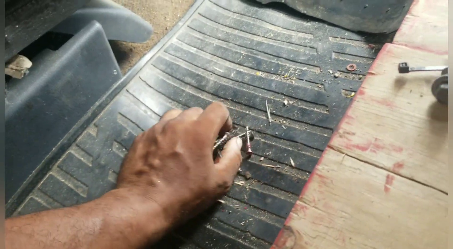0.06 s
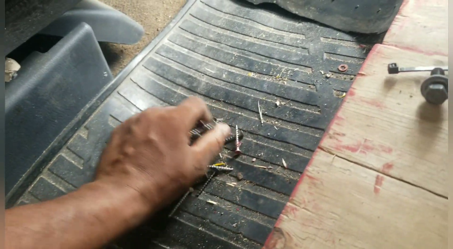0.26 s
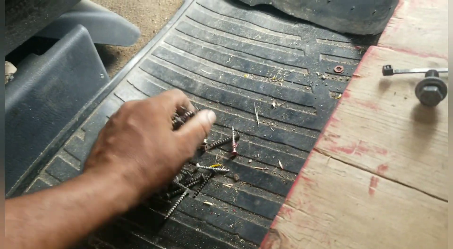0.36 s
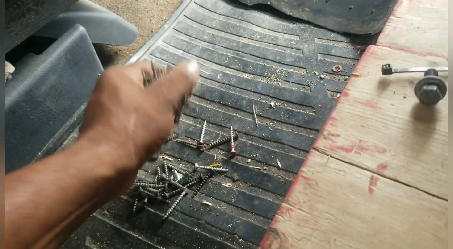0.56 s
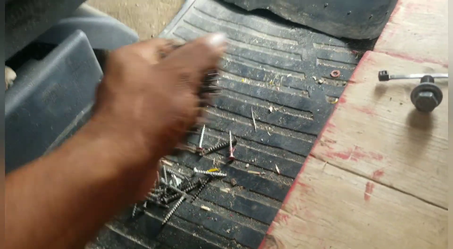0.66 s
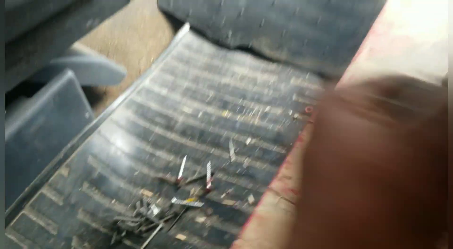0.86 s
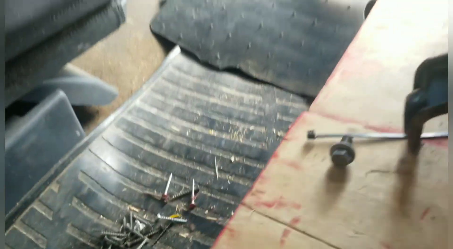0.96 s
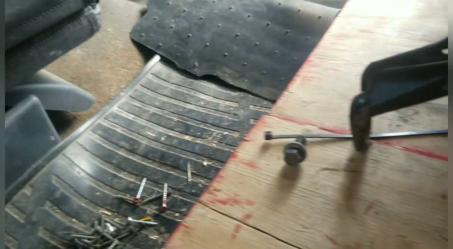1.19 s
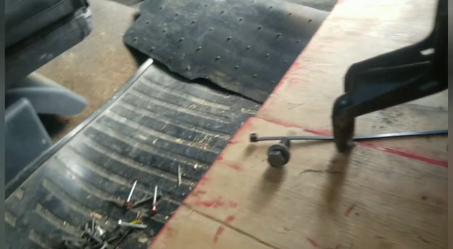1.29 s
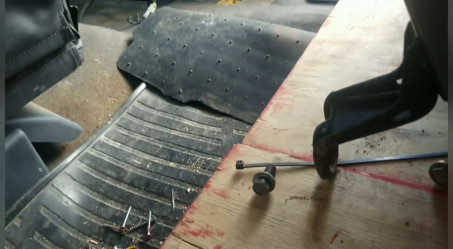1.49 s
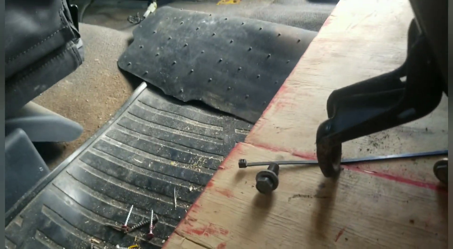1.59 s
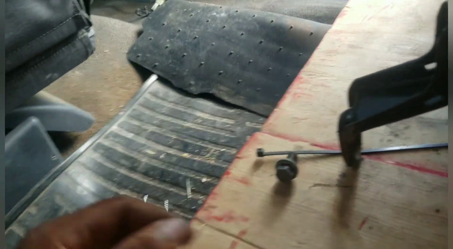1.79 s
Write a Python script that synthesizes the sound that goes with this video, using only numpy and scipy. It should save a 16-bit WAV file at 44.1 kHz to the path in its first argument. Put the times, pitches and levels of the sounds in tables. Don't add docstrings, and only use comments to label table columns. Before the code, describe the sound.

Handful of steel screws jingles sharply, pauses, then rattles and knocks on thin plastic inside a vehicle

```python
import sys
import numpy as np
from scipy import signal
from scipy.fft import rfft, irfft
from scipy.io import wavfile

SR = 44100
rng = np.random.default_rng(int(sys.argv[2]) if len(sys.argv) > 2 else 0)


def transcribe(u):
    v = np.clip(np.atleast_2d(u).T, -1, 1)
    q = np.round(v * 32767).astype(np.int16)
    wavfile.write(sys.argv[1], SR, q)


def ratio(d):
    e = np.asarray(d, float) / 20
    return 10 ** e


N = 81585

# f/Hz, level/dB
STILL_CAB_COLOUR = [(12, -45), (20, -12), (65, 5), (107, -16.5), (177, -17), (228, -29.5), (607, -42),
                    (1480, -43.5), (16000, -44)]
# t/s, level/dB
BOOM_LEVEL = [(0, -61), (.14, -50.5), (.45, -59), (.55, -49), (.65, -44.5), (.78, -50), (.9, -46.5),
              (1.0, -50), (1.08, -55), (1.27, -57.5), (1.4, -55), (1.62, -55), (1.85, -57)]
# f/Hz, level/dB
BOOM_COLOUR = [(53, -60), (90, -35.5), (140, 2.5), (199, -1.5), (344, -16), (400, -17.5), (447, -29),
               (1000, -50.5), (1300, -64), (2200, -120)]
# t/s, level/dB
RUB_LEVEL = [
    (0, -78),
    (.2, -62.5),
    (.5, -60.5),
    (.56, -73),
    (.64, -66.5),
    (.75, -73),
    (.92, -76),
    (1.0, -94.5),
    (1.85, -91.5),
]
# f/Hz, level/dB
RUB_COLOUR = [(1060, -48), (1800, -11.5), (2500, -8.5), (4170, -14.5), (5390, -0.5), (7490, -17.5),
              (8280, -32), (13400, -9), (16000, -20.5)]
# t/s, level/dB
SCUFF_LEVEL = [
    (0, -38.5),
    (.03, -55),
    (.2, -46.5),
    (.45, -55.5),
    (.68, -75),
    (.8, -67),
    (1.25, -68),
    (1.6, -56.5),
    (1.72, -59.5),
    (1.85, -63.5),
]
# f/Hz, level/dB
SCUFF_COLOUR = [(180, -36), (300, 2.5), (679, -2.5), (847, -7.5), (1400, -16.5), (2500, -19.5), (3250, -57),
                (5500, -120)]
# f/Hz, likeness (1 = the same)
LIKENESS = [(60, 0.9), (240, 0.63), (950, 0.56), (3770, -0.02), (15000, -0.15)]
# f/Hz, time to fall 60 dB t60/s
CAB_T60 = [(100, 0.043), (500, 0.28), (2000, 0.23), (6000, 0.2), (15000, 0.22)]
# t/s, peak level/dB, thump level/dB, top level/dB
GRABS = [(0.002, -58.5, -12, -1.5), (0.03, -58.5, 16.5, -21), (0.0574, -59.5, 13.5, 5.5),
         (0.077, -54, -21, 0), (0.1466, -54.5, 13.5, -1.5), (0.1725, -59.5, 5, 8), (0.2463, -20.5, -3, 1.5),
         (0.255, -32, -6, -7), (0.271, -38.5, -12, 14), (0.306, -33.5, -8, -6), (0.3591, -35, 3, 4.5),
         (0.368, -36.5, -12, -6), (0.384, -47, -14, -14), (0.4744, -54, 2, 6.5), (0.5701, -60, 4, -35),
         (0.6144, -59.5, 9, -31), (0.632, -64, 16.5, -29), (0.886, -79.5, 21, -9), (0.983, -78, 17.5, -9)]
# f/Hz, level/dB per Hz
MAT_COLOUR = [(59, -37), (100, -19.5), (768, -8), (3540, -14.5), (3860, -15.5), (4290, -18), (4770, -8),
              (11400, -16), (16000, -10)]
# f/Hz, level/dB, t60/s
HEAP_MODES = [(155.8, -2.5, 0.24), (743, -4, .12), (1057, -10.5, 0.49), (930, -19, .3), (3823, -3, 0.28),
              (3820, -7.5, 0.22), (4823, -4, 0.33), (6115, -5.5, 0.39), (10100, -6.5, 0.18),
              (11070, -2, 0.2), (11555, -3.5, 0.22), (12460, -5.5, .12), (14100, -17.5, .12),
              (15070, -15, .14)]
# t/s, peak level/dB
TICKS = [(0.0286, -37.5), (0.0762, -44.5), (0.148, -51), (.175, -57), (0.3586, -27.5), (.571, -55),
         (0.98, -63.5), (1.299, -32), (1.3397, -16), (1.3589, -16.5), (1.384, -20), (1.4115, -44),
         (1.478, -31), (1.61, -62), (1.6158, -46), (1.6225, -40), (1.659, -51.5), (1.693, -65)]
TICK_HZ = [600, 4500, 4500, 13000, 1200, 5000, 900, 2200, 3200, 2400, 3200, 4000, 2500, 2500, 4200, 2300,
           3600, 4500]
# t/s, level/dB, t60/s
JOLTS = [(1.5, -36.5, 0.2), (1.345, -40, 0.26), (0.27, -40, .2), (0.36, -48, 0.51), (0.34, -50.5, 0.58),
         (1.3, -61, 1), (1.352, -25.5, 0.15), (1.352, -25, 0.15), (1.463, -28, 0.079), (1.7, -35, 0.2),
         (1.7, -63, .5), (1.785, -63, 0.3), (1.385, -39, 0.089), (.365, -37, 0.13), (.25, -34, 0.092),
         (1.338, -30, 0.19), (1.465, -30, 0.13), (.248, -37.5, .25), (.362, -43, 0.25), (.56, -65.5, 0.49)]
JOLT_HZ = [50, 113, 1048, 1030, 1003, 1520, 350, 215, 515, 170, 1020, 1030, 9400, 13700, 390, 910, 990,
           3860, 3880, 1010]
# t/s, peak level/dB, thump level/dB, top level/dB
DROPS = [(1.0864, -65.5, 5, -23), (1.105, -71, 0, -17), (1.287, -58.5, 6, 6), (1.2995, -36.5, 4.5, -17),
         (1.31, -47, -13, 0), (1.3221, -32, -6.5, -10), (1.331, -26.5, 1, -12), (1.3385, -15, -9.5, -24),
         (1.3474, -23, -0.5, -10), (1.358, -21, -4, -9), (1.3769, -22, -4.5, -14), (1.3903, -32, -3, -5.5),
         (1.4134, -27.5, -0.5, -10.5), (1.462, -23.5, 7.5, -11), (1.4786, -34, 18.5, -31),
         (1.4936, -40, -6, -15), (1.5154, -44.5, 17, -3), (1.5294, -39, 11.5, -28),
         (1.6019, -46.5, 12, -30), (1.6158, -42, -15, -25), (1.6245, -47, -7.5, -22), (1.636, -63, -8, -15),
         (1.6525, -55, -23.5, -25), (1.6929, -50.5, -13, -19), (1.716, -59, -11, -23),
         (1.736, -56, 5.5, -25.5), (1.762, -62, 3, -29), (1.84, -61, 0.5, -26)]
# f/Hz, level/dB per Hz
TUB_COLOUR = [(59, -27), (100, -47.5), (177, -2), (277, -17.5), (547, -7), (691, -12.5), (3470, -11),
              (8640, -23), (16000, -18)]
# f/Hz, level/dB, t60/s
TUB_MODES = [(179.5, -7.5, 0.48), (221, -4.5, 0.2), (330.4, -5, 0.2), (385.4, -1.5, 0.2), (513, -31, 0.067),
             (602, -16, 0.12), (918, -4, 0.11), (1244, -1, 0.097), (1950, -13, 0.06), (2353, 5, 0.051),
             (3500, -12, .2), (9750, -19, 0.11)]
# t/s, level/dB
SLIDE_LEVEL = [
    (1.281, -49),
    (1.29, -56),
    (1.33, -45),
    (1.35, -39),
    (1.401, -42),
    (1.445, -52),
    (1.47, -73),
    (1.525, -63),
    (1.56, -81),
]
EDGES = 22 * 2 ** np.arange(0, 9.8, .4)

CORNERS = 3
CORNER_SPREAD_DB, CORNER_DETUNE = 3.0, .003
STEEL_T60_S = .12
TOUCHES = 24
TOUCH_SPREAD_DB, LATER_LOSS_DB = 3.0, 8
THUMP_HZ = 700
TICK_T60_S, TICK_OCTAVES, TICK_LAG = .022, .8, 14


def rms_one(x):
    return x / np.sqrt(np.mean(x ** 2) + 1e-20)


def at_hz(points, hz):
    table_hz, db = np.transpose(points)
    return np.interp(np.log(hz), np.log(table_hz), db, left=-90, right=-90)


def in_time(rows):
    s, db = np.transpose(rows)
    return np.interp(np.arange(N) / SR, s, db)


def drift(rate):
    r = np.exp(-80 * np.pi * rate / SR)
    white = rng.standard_normal(N // 40 + 2002)
    slow = signal.lfilter([1], [1, -2 * r, r * r], white)[2000:]
    return np.interp(np.arange(N) / 40, np.arange(len(slow)), rms_one(slow))


def band(x, low_hz, high_hz):
    return signal.sosfilt(signal.butter(2, [low_hz, high_hz], "band", fs=SR, output="sos"), x)


def banded_noise(colour, patchy_db, grain_db=0):
    out, together = 0, drift(6)
    grain = ratio(grain_db * rng.standard_normal(N + 4000))
    white = rng.standard_normal((2, 2, N + 4000)) * grain
    for k, (low, high) in enumerate(zip(EDGES, EDGES[1:])):
        hz = np.sqrt(low * high)
        mid, side = band(white[k % 2], low, high)[:, -N:]
        alike = np.clip(np.interp(hz, *np.transpose(LIKENESS)), 0, 1)
        flicker_db = patchy_db * (.6 * together + drift(14))
        gain = ratio(at_hz(colour, hz) + flicker_db)
        out = out + gain * (np.sqrt(1 + alike) * mid + np.sqrt(1 - alike) * side * [[1], [-1]])
    return rms_one(out)


def response(colour, modes, ring_db, tail_db, t60_share, lead_s, pan_db):
    t = np.arange(SR // 2) / SR
    white, out = rng.standard_normal((2, CORNERS, 2, len(t))), 0
    crack = signal.unit_impulse(len(t))
    echo_hz, echo_t60 = np.transpose(CAB_T60)
    for k, (low, high) in enumerate(zip(EDGES[3:], EDGES[4:])):
        hz = np.sqrt(low * high)
        t60 = t60_share * np.interp(np.log(hz), np.log(echo_hz), echo_t60)
        fade = ratio(tail_db - 60 * t / t60) * (1 - np.exp(-t / 0.00046))
        echo = (white[k % 2] * hz + white[k % 2, :, :1] * 900) / np.hypot(hz, 900)
        out = out + ratio(at_hz(colour, np.minimum(hz, 15500))) * band(crack + fade * echo, low, high)
    out = out / np.sqrt(np.mean(np.sum(out ** 2, axis=2)))

    turn = rng.uniform(0, 2 * np.pi, (len(modes), CORNERS, 2, 1))
    vary = rng.standard_normal((len(modes), 2, CORNERS, 1, 1))
    for (hz, db, t60), phase, (louder, higher) in zip(modes, turn, vary):
        t60 = min(t60, STEEL_T60_S) if hz > 2000 else t60
        corner_hz = hz * (1 + CORNER_DETUNE * higher)
        swing = np.sin(2 * np.pi * corner_hz * t + phase * min(1, hz / 2500) ** 2)
        fade = ratio(-60 * t / t60) * (1 - np.exp(-t / 0.0012))
        out = out + ratio(ring_db + db + CORNER_SPREAD_DB * louder) * fade * swing

    hz = np.arange(len(t) // 2 + 1) * 2
    right = irfft(rfft(out[:, 1]) * np.exp(-2j * np.pi * lead_s * hz), len(t))
    return np.stack([out[:, 0], right], axis=1) * ratio([[pan_db / 2], [-pan_db / 2]])


def clatter(events, answers, gain_db, scatter_s, lead_s, top_hz):
    s, db, low_db, top_db = np.array(events).T[:, :, None]
    place, size, sign, spot = rng.random((len(events), 4, TOUCHES)).transpose(1, 0, 2)
    at = ((s - lead_s + scatter_s * place) * SR).astype(int).ravel().clip(0, N - 1)
    touch_db = db + gain_db - LATER_LOSS_DB * place - TOUCH_SPREAD_DB * np.log(size + .01)
    height = ratio(touch_db) * np.minimum(place / .2, 1) * np.sign(sign - .5)
    corner, out = (spot * CORNERS).astype(int), 0
    thump_at = ((s[:, 0] - .003).clip(0) * SR).astype(int)
    thump_height = ratio(db + gain_db + low_db + 8)[:, 0]
    for k, answer in enumerate(answers):
        here = height * (corner == k)
        thumps = np.bincount(thump_at, thump_height * (corner[:, 0] == k), N)
        body = np.bincount(at, here.ravel(), N)
        top = np.bincount(at, (here * ratio(top_db)).ravel(), N)
        parts = [("low", THUMP_HZ, thumps), ("band", (THUMP_HZ, top_hz), body), ("high", top_hz, top)]
        for kind, hz, clicks in parts:
            part = signal.sosfilt(signal.butter(3, hz, kind, fs=SR, output="sos"), answer)
            part = part / np.sqrt(np.sum(part ** 2))
            out = out + signal.fftconvolve(clicks[None], part, axes=1)[:, :N]
    return out


def still_cab():
    return ratio(-54.5 - 2.0) * banded_noise(STILL_CAB_COLOUR, patchy_db=1.1)


def cab_boom():
    return ratio(in_time(BOOM_LEVEL) - 1.5) * banded_noise(BOOM_COLOUR, patchy_db=1.0) * ratio([[1.5], [-1.5]])


def sleeve_rub():
    noise = banded_noise(RUB_COLOUR, patchy_db=3.6, grain_db=5)
    return ratio(in_time(RUB_LEVEL) + 3) * noise * ratio([[2.2], [-2.2]])


def finger_scuff():
    noise = banded_noise(SCUFF_COLOUR, patchy_db=3.5, grain_db=-4.0)
    return ratio(in_time(SCUFF_LEVEL) - 1.5) * noise * ratio([[2.2], [-2.2]])


def screws_on_mat():
    answer = response(MAT_COLOUR, HEAP_MODES, ring_db=-33.5, tail_db=-30.0, t60_share=1.0,
                      lead_s=0.0003745, pan_db=3.0)
    answer = answer - .85 * band(answer, 3250, 3700)
    return clatter(GRABS, answer, gain_db=18.5, scatter_s=.013, lead_s=0.0043, top_hz=8500)


def ticks():
    length = 1500
    out, age = np.zeros((2, N + 2000)), np.arange(length) / SR
    for (s, db), hz, white in zip(TICKS, TICK_HZ, rng.standard_normal((len(TICKS), length))):
        low_hz, high_hz = hz / 2 ** TICK_OCTAVES, min(hz * 2 ** TICK_OCTAVES, 15500)
        burst = band(white * ratio(-60 * age / TICK_T60_S), low_hz, high_hz)
        burst = burst / np.abs(burst).max()
        for port, lag in enumerate((0, TICK_LAG)):
            i = int(s * SR) + lag
            out[port, i:i + length] += ratio(db + 2 - 4 * port) * burst
    return out[:, :N]


def jolts():
    t, out, waver = np.arange(N) / SR, 0, drift(25)
    for k, ((s, db, t60), hz) in enumerate(zip(JOLTS, JOLT_HZ)):
        age = np.maximum(t - s, 0)
        swing = np.sin(2 * np.pi * hz * age + .5 * np.roll(waver, 3001 * k))
        swing = swing * ratio(2.5 * np.roll(waver, -3701 * k))
        out = out + ratio(db - 60 * age / t60) * (1 - np.exp(-age / .004)) * swing
    return out * ratio([[1.5], [-1.5]])


def screws_in_tub():
    answer = response(TUB_COLOUR, TUB_MODES, ring_db=-36.5, tail_db=-26.5, t60_share=1.0,
                      lead_s=0.000362, pan_db=3.0)
    return clatter(DROPS, answer, gain_db=13.5, scatter_s=.005, lead_s=.001, top_hz=5340)


def sliding_tip():
    s, db = np.transpose(SLIDE_LEVEL)
    gate = ratio(np.interp(np.arange(N) / SR, s, db, left=-120, right=-120))
    white = rng.standard_normal((2, N))
    upper = band(band(white, 15500, 15750), 15500, 15750)
    lower = band(band(white, 15280, 15420), 15280, 15420)
    return gate * ratio(3.5 * drift(30)) * rms_one(upper + .4 * lower) * ratio([[4], [0]])


def scene():
    background = still_cab() + cab_boom()
    hand = sleeve_rub() + finger_scuff()
    screws = screws_on_mat() + ticks() + jolts() + screws_in_tub() + sliding_tip()
    return background + hand + screws


def band_limit(x):
    return signal.sosfilt(signal.butter(12, 16840, fs=SR, output="sos"), x)


def record(dry):
    dipped = dry - .6 * band(dry, 8300, 8900)
    low_pass = signal.ellip(12, 1, 80, 15740, fs=SR, output="sos")
    mix = signal.sosfilt(low_pass, dipped)
    return band_limit(mix)


dry = scene()
out = record(dry)
transcribe(out)
```